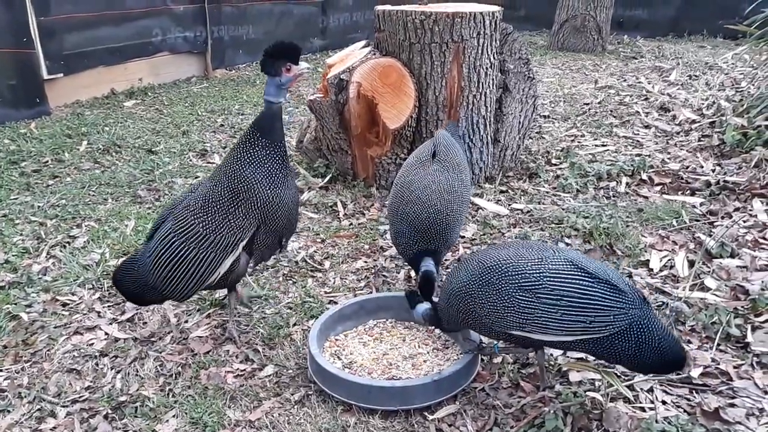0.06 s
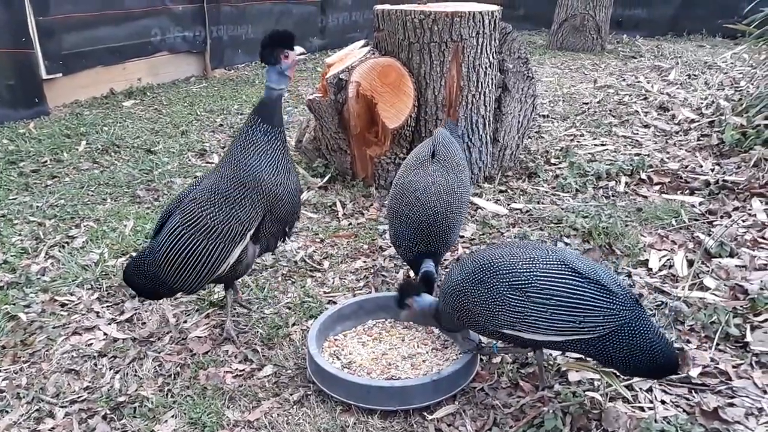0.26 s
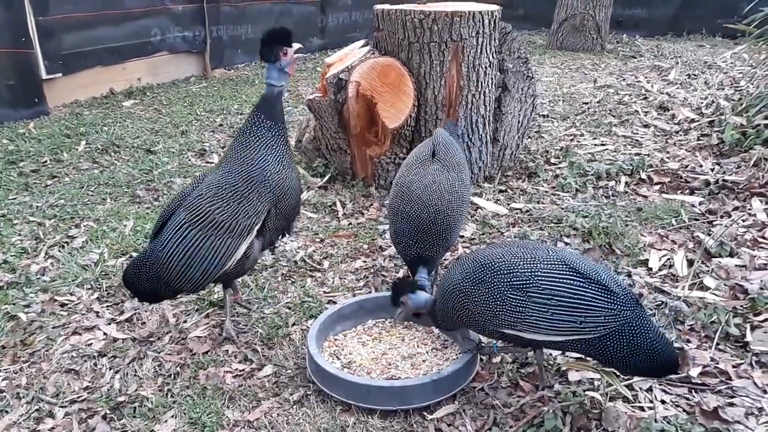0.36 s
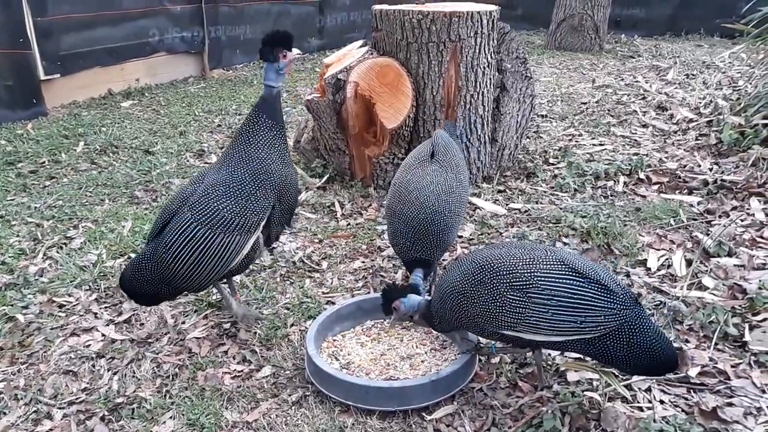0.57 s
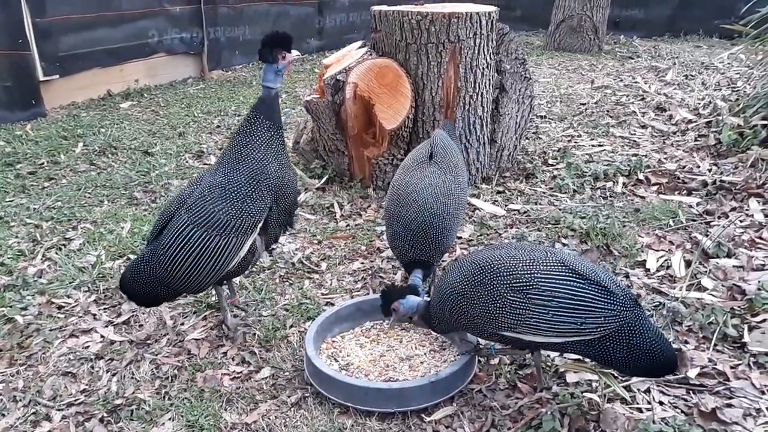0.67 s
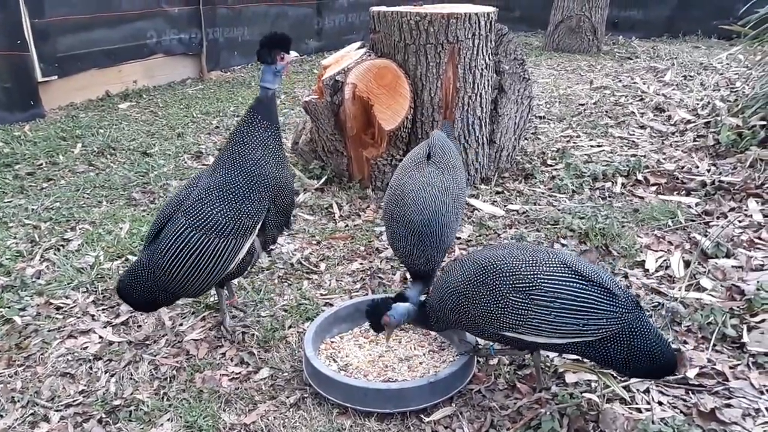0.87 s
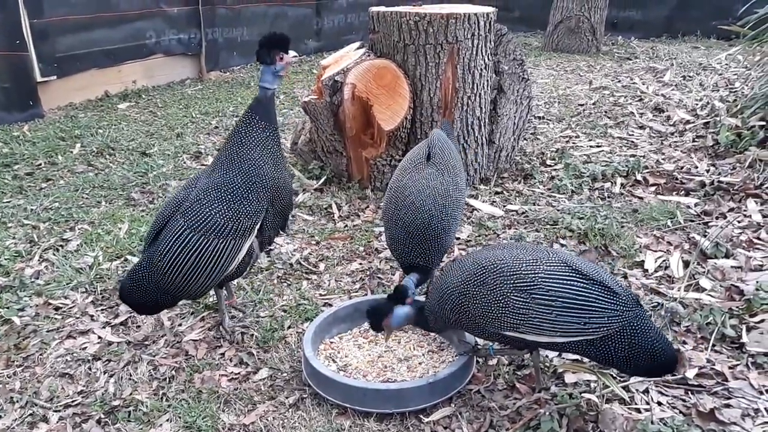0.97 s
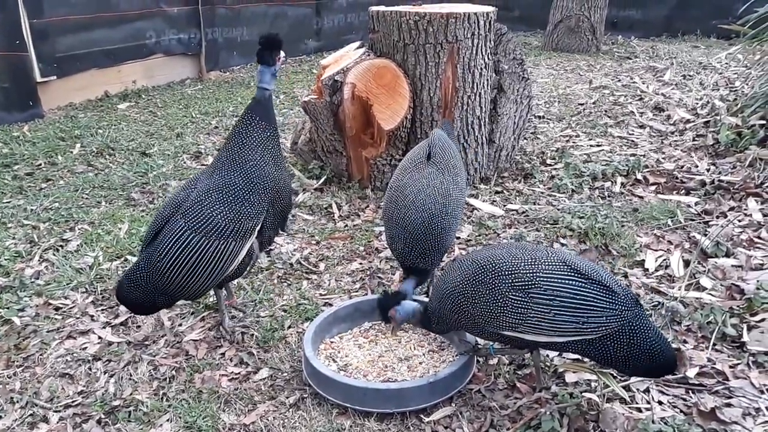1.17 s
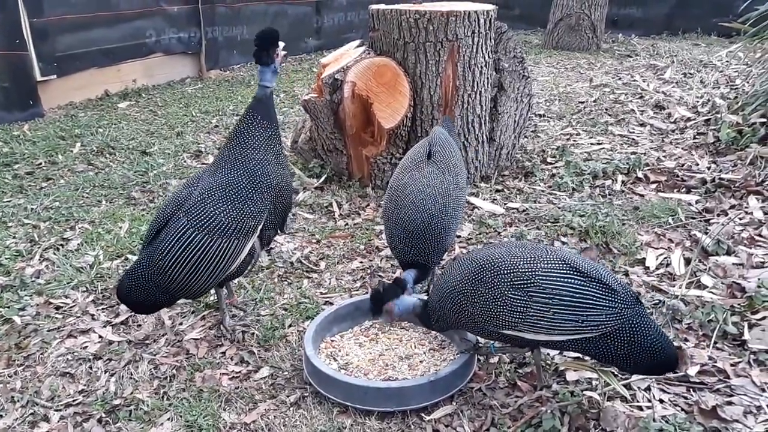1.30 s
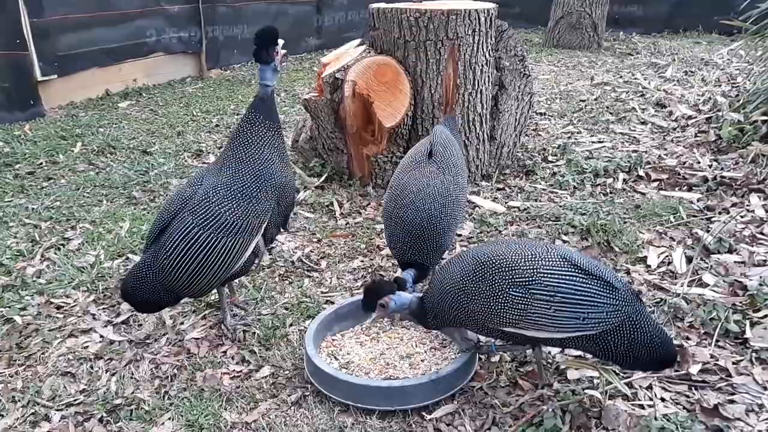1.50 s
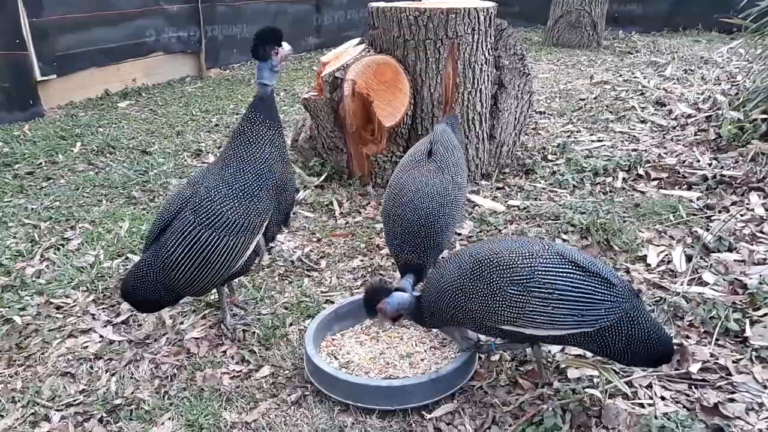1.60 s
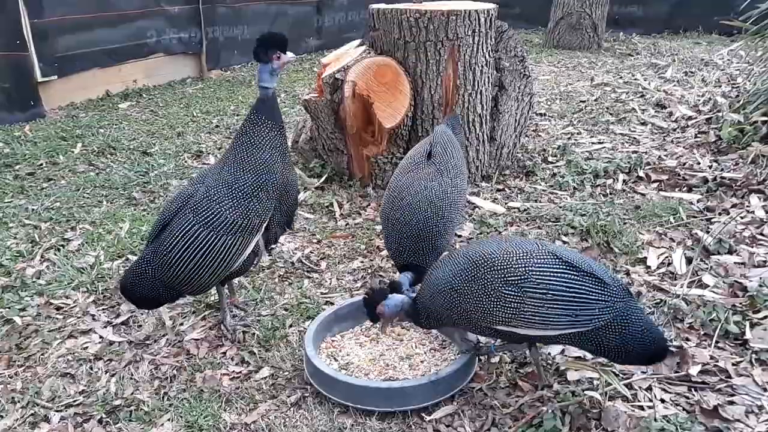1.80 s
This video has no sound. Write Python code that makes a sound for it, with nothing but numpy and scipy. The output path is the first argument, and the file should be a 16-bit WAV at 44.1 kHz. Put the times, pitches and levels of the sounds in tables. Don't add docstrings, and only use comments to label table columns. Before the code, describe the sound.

Harsh, piping guinea fowl cackles in two quick runs, with faint seed pecking between them outdoors

```python
import sys
import numpy as np
from scipy import signal
from scipy.fft import rfft, irfft
from scipy.io import wavfile
from scipy.ndimage import uniform_filter1d

SR = 44100
rng = np.random.default_rng(int(sys.argv[2]) if len(sys.argv) > 2 else 0)


def boost_factor(decibels):
    exponent = np.asarray(decibels, float) / 20
    return 10 ** exponent


def master_out(mix):
    frames = np.transpose(np.atleast_2d(mix))
    ceiling = np.clip(frames, -1, 1)
    pcm = np.round(ceiling * 32767).astype(np.int16)
    wavfile.write(sys.argv[1], SR, pcm)


N = 81585
RUN_IN = SR // 4
NOTE_LEAD_IN_S = 0.03


def rms_one(x):
    return x / np.sqrt(np.mean(np.abs(x) ** 2) + 1e-20)


def at_hz(points, hz, column=1):
    points = np.array(points)
    return np.interp(np.log(hz + 1), np.log(points[:, 0]), points[:, column])


def coloured(x, gain):
    size = x.shape[-1]
    return irfft(rfft(x) * gain(np.arange(size // 2 + 1) * SR / size), size)


def drift(rate_hz, size):
    r = np.exp(-2 * np.pi * rate_hz / SR)
    wander = signal.lfilter([1], [1, -2 * r, r * r], rng.standard_normal(size + 2000))
    return rms_one(wander[2000:])


def add(track, s, sound):
    i = int(s * SR) + RUN_IN
    track[i:i + len(sound)] += sound[:len(track) - i]


def glide(t, start, length, from_hz, to_hz, overtones_db, bend=1., swell=1.):
    u = np.clip((t - start) / length, 0, 1)
    phase = 2 * np.pi * np.cumsum(from_hz + (to_hz - from_hz) * u ** bend) / SR
    shape = np.sin(np.pi * u ** swell)
    second, third = boost_factor(overtones_db)
    return shape * (np.sin(phase) + second * np.sin(2 * phase) + third * np.sin(3 * phase)), shape


PARTIALS = [(1, 0), (2, 0), (3, 0), (4, 0), (2, -1), (-1, 1), (4, -2), (3, -1), (0, 1), (-3, 3), (-1, 2),
            (4, -1), (1, 1), (0, 2), (-3, 4), (2, 1), (-1, 3), (1, 2), (5, -1)]
PARTIAL_DB = [-2, -18.5, -27, -36, -21, -28, -21, -19.5, -18.5, -34.5, -25.5, -20, -25, -20.5, -47, -30,
              -41, -53, -32]


def membranes(phase, other, shape, second_db, flutter):
    tone = 0
    for (a, b), db in zip(PARTIALS, PARTIAL_DB):
        level_db = db + abs(b) * second_db
        if b == 0 and a > 1:
            level_db = level_db - 6 * boost_factor(second_db)
        partial = boost_factor(level_db) * np.exp(1j * (a * phase + b * other + a * b))
        if b == 0:
            partial = partial * shape ** (0.5 * (a - 1)) * (1 + flutter / a)
        tone = tone + partial
    return tone.real


FLICK_PARTIALS_DB = [-30, -34]
ATTACK_S, RELEASE_S, DROOP_CURVE = 0.0045, 0.008, 1.68
SAG_HZ, WOBBLE_HZ, SHIMMER = 22.2, 6.35, 0.057
END_SAG_HZ, END_BEND_HZ = 50, 55.6
SECOND_RATIO, SECOND_RISE_S, SECOND_START_DB = 1.6405, 0.014, -12
FLUTTER_HZ, FLUTTER_UPPER_DB, THROB_DB = 248.24, -31, -30.5
LEAD_RASP_DB, SNAP_SHARPNESS = -18, 14.0


def note(lead_s, lead_to_hz, length, hz, droop_db, second_db, flutter_db, rasp_db, lead_db, flick_db):
    t = np.arange(SR // 6) / SR - NOTE_LEAD_IN_S
    size = len(t)
    u = np.clip(t / length, 0, 1.5)
    end = np.clip((t - length) / RELEASE_S, 0, 2)
    attack = np.clip(t / ATTACK_S + 0.25, 0, 1)
    release = np.exp(-(np.maximum(t - length, 0) / RELEASE_S) ** 0.87)
    shape = attack * boost_factor(-droop_db * u ** DROOP_CURVE) * release

    unsteady = 1 + 7.8 * boost_factor(rasp_db) + 2.7 * end
    tone_hz = hz + SAG_HZ * (0.5 - u) - END_SAG_HZ * end + WOBBLE_HZ * unsteady * drift(150, size)
    phase = 2 * np.pi * np.cumsum(tone_hz) / SR
    end_bend = 2 * np.pi * np.cumsum(END_BEND_HZ * end) / SR
    other = SECOND_RATIO * phase + end_bend + 0.13 * unsteady * drift(50, size)
    second = np.minimum(second_db + SECOND_START_DB * np.exp(-np.maximum(t, 0) / SECOND_RISE_S), 3)

    beat = np.exp(2j * np.pi * np.cumsum(FLUTTER_HZ * (1 + 0.06 * drift(60, size))) / SR)
    sidebands = 1 / beat + boost_factor(FLUTTER_UPPER_DB) * (beat + beat ** -2)
    flutter = boost_factor(flutter_db) * (0.5 + 0.91 * u ** 2) * sidebands
    tone = membranes(phase, other, shape, second, flutter)
    lead, lead_shape = glide(t, 0.004 - lead_s, lead_s, 2040, lead_to_hz, [-19.5, -22.5],
                             bend=0.32, swell=1.53)
    flick, _ = glide(t, length - 0.002, 0.016, 1960, 2230, FLICK_PARTIALS_DB, bend=0.9, swell=0.9)

    voiced = shape * tone * (1 + SHIMMER * unsteady * drift(130, size))
    voiced = voiced + boost_factor(lead_db) * lead * (1 + 0.5 * beat.real) + boost_factor(flick_db) * flick
    voiced = voiced + shape * u * boost_factor(flutter_db + THROB_DB) * (0.5 * beat + beat ** 2).real
    snaps = shape * np.exp(SNAP_SHARPNESS * (np.cos(phase) - 1) + 1.71 * boost_factor(second / 2) * np.cos(other))
    rasp = boost_factor(rasp_db) * shape * (1 + 0.5 * beat.imag + 4.5 * end)
    rasp = rasp + boost_factor(lead_db + LEAD_RASP_DB) * lead_shape
    return voiced, snaps, rasp


# [t/s, length/s, level/dB, from f/Hz, to f/Hz]
IN_BREATHS = [
    (0.165, 0.023, -50, 2448, 2782),
    (0.901, 0.031, -50, 2105, 2503),
    (1.17, 0.035, -54, 2143, 2440),
    (1.279, 0.018, -46, 2300, 2590),
]


def whistle_in(voiced):
    t = np.arange(SR // 20) / SR
    for s, length, db, from_hz, to_hz in IN_BREATHS:
        whistle, _ = glide(t, 0, length, from_hz, to_hz, [-30, -45], bend=0.9, swell=0.7)
        add(voiced, s, boost_factor(db) * whistle)


# [f/Hz, width/Hz, level/dB]
THROAT_MODES = [(625, 210, -15), (1836, 970, -4.5), (2594, 1400, -13.5), (3786, 340, -8), (4417, 360, 7.5),
                (5790, 1400, -13.5), (6110, 540, -4.5), (11280, 500, -17), (14000, 9000, -28)]


def throat(f):
    power = sum(boost_factor(db) ** 2 / (1 + (2 * (f - hz) / width) ** 4) for hz, width, db in THROAT_MODES)
    return np.sqrt(power)


def beak(f):
    return boost_factor(4 + 8 / (1 + (2 * (f - 5765) / 240) ** 2))


# [tone t/s, length/s, level/dB, f/Hz, droop over tone/dB]
CALLS = [(-.2, .05, -20.5, 1750, 2.5), (-.13, 0.063, -16.5, 1765, -3), (0.199, .04, -15.5, 1667, 14.5),
         (0.293, 0.026, -14.5, 1692, 7), (.36, 0.041, -9.5, 1713, 7), (0.435, 0.041, -10.5, 1725, 3.5),
         (0.955, 0.027, -13.5, 1675, 16.5), (1.223, 0.034, -19.5, 1709, 9.5),
         (1.314, 0.025, -12.5, 1723, 5.5), (1.38, 0.027, -9, 1746, 5), (1.447, 0.03, -9.5, 1749, 1),
         (1.511, 0.056, -11.5, 1748, -0.5)]
# [second membrane/dB, flutter/dB, rasp/dB, lead-in/dB, flick/dB]
CALL_VOICES = [(-20.5, -42.5, -42.5, -9, -28), (-6, -44.5, -23.5, -1, -40), (4, -5, -9, -5, -18.5),
               (-20.5, -23, -27, -4, -16), (-15, -50, -31, -20, -17), (-2.5, -19, -24.5, -6, -48.5),
               (2.5, -7.5, -16, -6, -25), (-32, -2, -24.5, -12, -12), (-23, -52.5, -36, -6.5, -11.5),
               (-18.5, -63, -43.5, -8.5, -12), (-10, -33.5, -47.5, -6.5, -9.5), (-0.5, -37, -26.5, -5, -20)]
# [f/Hz, level/dB]
SNAP_SPECTRUM = [(5000, -74.5), (7200, -11), (9800, -36), (11000, -0.5), (12500, -5), (15000, -2),
                 (16000, -5)]
LEAD_S, LEAD_TO_HZ = 0.018, 1916
LONG_LEAD_S, LONG_LEAD_TO_HZ = 0.03, 1740
RASP_GAIN, SNAP_DB, BODY_CUT_HZ = 4.5, -9, 150


def caller():
    size = N + RUN_IN
    voiced, snaps, rasp = np.zeros((3, size))
    for k, ((s, length, db, hz, droop_db), voice) in enumerate(zip(CALLS, CALL_VOICES)):
        lead = (LONG_LEAD_S, LONG_LEAD_TO_HZ) if k == 6 else (LEAD_S, LEAD_TO_HZ)
        parts = note(*lead, length, hz, droop_db, *voice)
        for track, part in zip((voiced, snaps, rasp), parts):
            add(track, s - NOTE_LEAD_IN_S, boost_factor(db) * part)
    whistle_in(voiced)
    air = RASP_GAIN * coloured(rasp * rng.standard_normal(size), throat)
    snaps = snaps * boost_factor(1.5 * drift(40, size))
    snaps = coloured(snaps, lambda f: boost_factor(at_hz(SNAP_SPECTRUM, f)) * (f > 4000))
    bird = coloured(voiced, beak) + air + boost_factor(SNAP_DB) * snaps
    return signal.sosfilt(signal.butter(4, BODY_CUT_HZ, "high", fs=SR, output="sos"), bird)


# [f/Hz, left lead/rad, left minus right/dB]
PORT_RESPONSE = [(600, -.95, -1.5), (1250, -1.6, -2), (1730, -1.95, 0), (1930, -1.15, 3), (2360, 1.7, -2.5),
                 (2900, .25, -3), (5200, 1.0, 1.5), (7500, -1.5, -.5)]
PORT_LAG_S = 0.000317


def at_ports(bird):
    def port(f, side):
        level = boost_factor(side * at_hz(PORT_RESPONSE, f, column=2) / 2 + 1.5)
        lead_rad = at_hz(PORT_RESPONSE, f) + 2 * np.pi * f * PORT_LAG_S
        return level * np.exp(side * 0.5j * lead_rad)
    return np.array([coloured(bird, lambda f: port(f, side)) for side in (1, -1)])


NEAR_DB, NEAR_T60_S, FAR_DB, FAR_T60_S = -9, 0.16, -22, 0.73
FIRST_ECHO_S, YARD_BAND_HZ = 0.004, [400, 10000]


def yard(x):
    t = np.arange(SR) / SR
    near = boost_factor(NEAR_DB) * boost_factor(-60 * t / NEAR_T60_S) / np.sqrt(NEAR_T60_S)
    far = boost_factor(FAR_DB) * boost_factor(-60 * t / FAR_T60_S) / np.sqrt(FAR_T60_S)
    onset = np.clip(t / FIRST_ECHO_S - 0.5, 0, 1)
    echoes = rng.standard_normal((2, SR)) * onset * (near + far) * np.sqrt(6 * np.log(10) / SR)
    echoes = signal.sosfilt(signal.butter(1, YARD_BAND_HZ, "band", fs=SR, output="sos"), echoes)
    return signal.fftconvolve(x[None], echoes, axes=1)[:, :len(x)]


# [t/s, level/dB, scatter length/s]
SEED_PECKS = [
    (.555, -52.5, 0.039),
    (0.626, -57.5, 0.032),
    (0.855, -61, 0.017),
    (1.016, -43, 0.012),
    (1.107, -53, 0.0084),
    (1.191, -48, 0.011),
    (1.686, -45, 0.013),
    (1.78, -55.5, 0.0097),
]
# [f/Hz, level per Hz/dB]
SEED_SPECTRUM = [(300, -12.5), (1000, 2), (3000, -3.5), (6500, -4.5), (7500, -21), (11000, -12.5),
                 (16000, -40)]


def pecks():
    shape, t = np.zeros(N + RUN_IN), np.arange(SR // 10) / SR
    for s, db, length in SEED_PECKS:
        add(shape, s, boost_factor(db) * np.exp(-t / length) * np.minimum(t / 0.0036, 1))
    hits = 1. * (rng.random(len(shape)) < 500 / SR)
    density = 0.87 + 0.55 * uniform_filter1d(hits, size=20) * 20
    grains = rng.standard_normal((2, len(shape))) * density
    return 4.0 * coloured(shape * grains, lambda f: boost_factor(at_hz(SEED_SPECTRUM, f)) * (f > 250))


# [f/Hz, level per Hz/dB]
HUSH_SPECTRUM = [(30, -35.5), (90, -9), (180, -10.5), (280, -3), (450, -12.5), (6500, -18), (7600, -36),
                 (16000, -27.5)]
# [f/Hz, correlation]
SIDE_LIKENESS = [(60, .93), (290, .9), (640, .5), (1400, -.3), (3100, 0), (16000, 0)]
HUSH_DB = -59


def hush():
    def part(x, sign):
        def gain(f):
            likeness = np.clip(at_hz(SIDE_LIKENESS, f), -1, 1)
            return boost_factor(at_hz(HUSH_SPECTRUM, f)) * np.sqrt(1 + sign * likeness)
        return coloured(x, gain)
    mid, side = rng.standard_normal((2, N))
    both = part(mid, 0.39) + part(side, -1) * [[1], [-1]]
    return boost_factor(HUSH_DB + 0.5 * drift(24, N)) * rms_one(both)


def scene():
    bird = caller()
    return (at_ports(bird) + yard(bird) + pecks())[:, RUN_IN:] + hush()


def band_limit(x):
    return signal.sosfilt(signal.butter(12, 16470, fs=SR, output="sos"), x)


def record(dry):
    top_cut = signal.cheby2(10, 60, 16800, fs=SR, output="sos")
    return band_limit(signal.sosfilt(top_cut, dry))


dry = scene()
out = record(dry)
master_out(out)
```